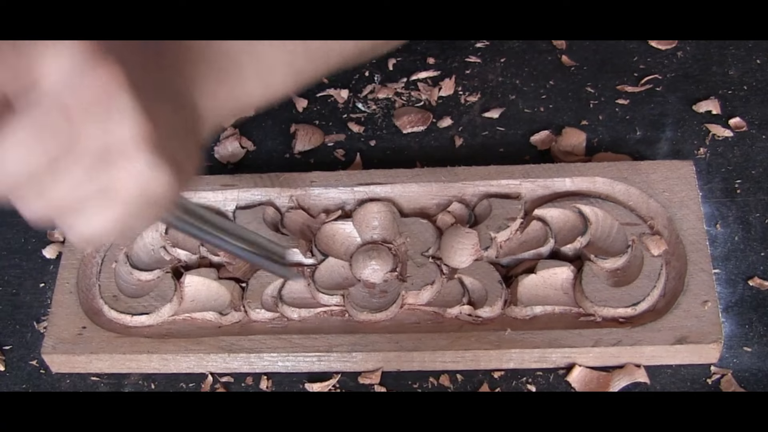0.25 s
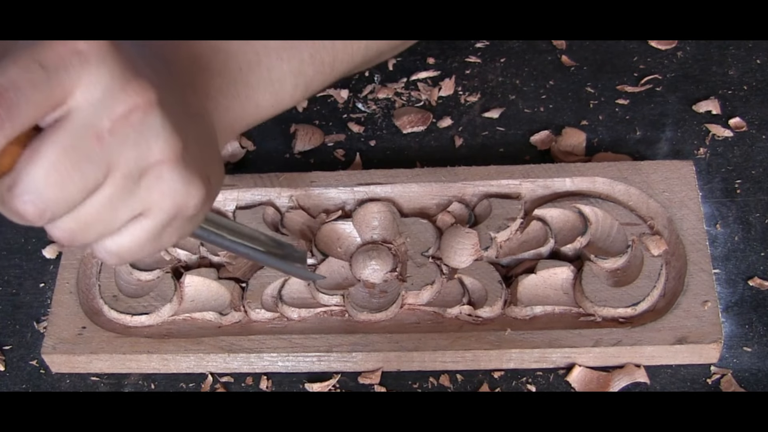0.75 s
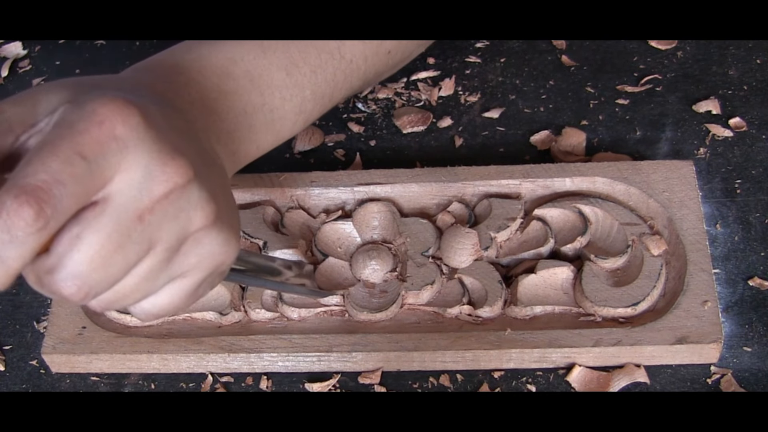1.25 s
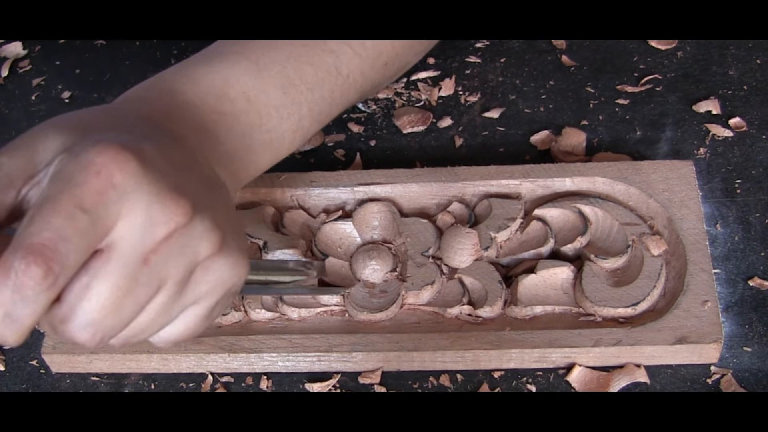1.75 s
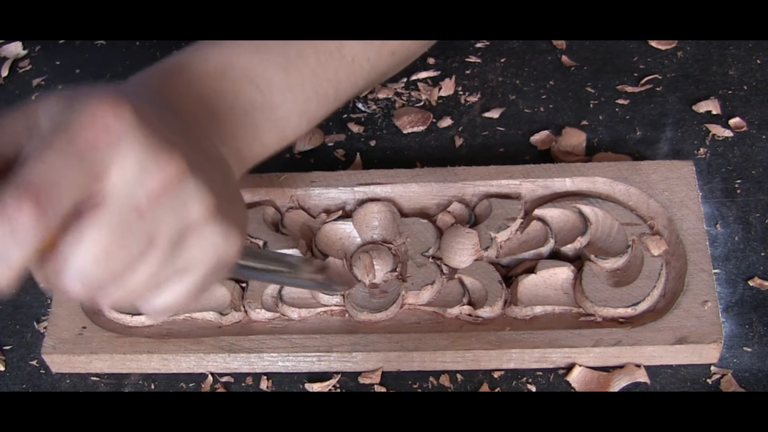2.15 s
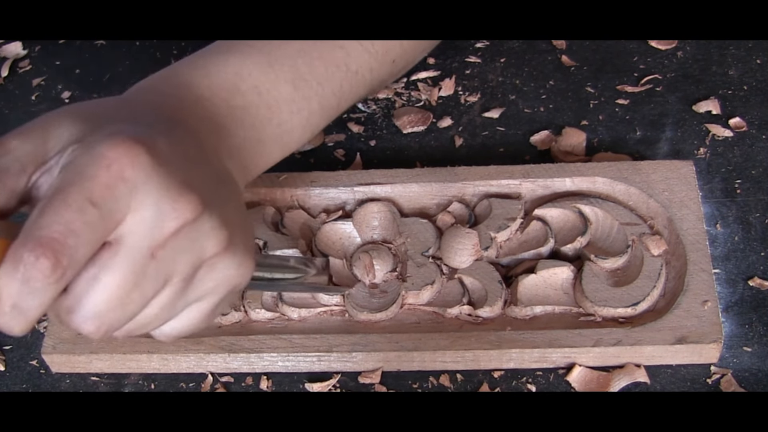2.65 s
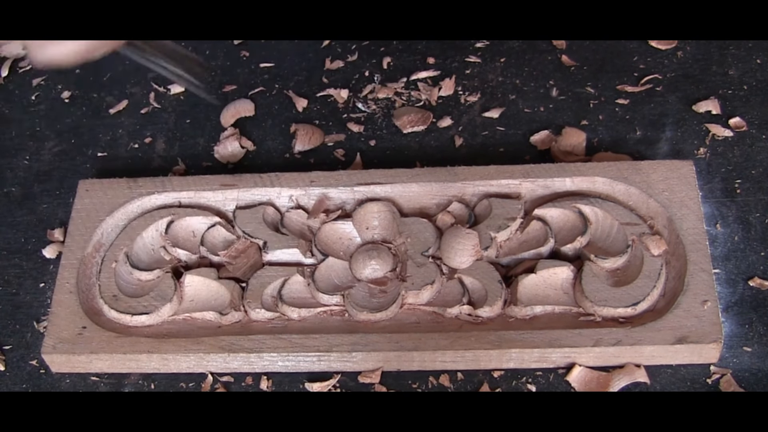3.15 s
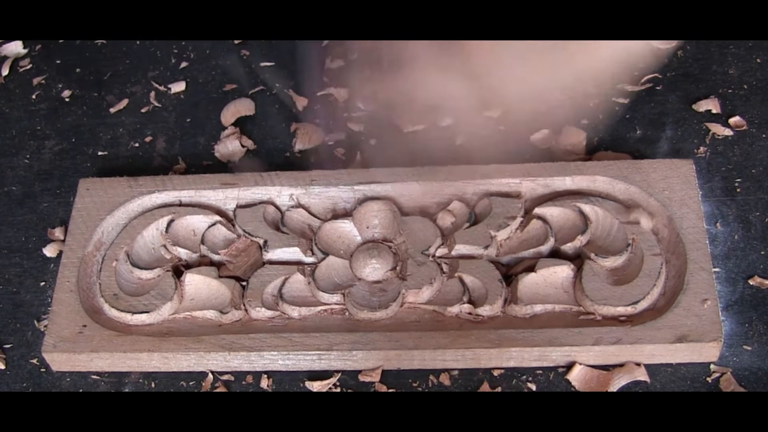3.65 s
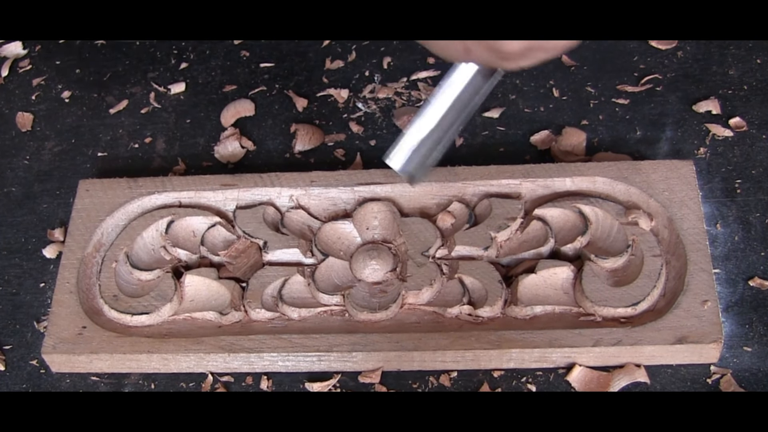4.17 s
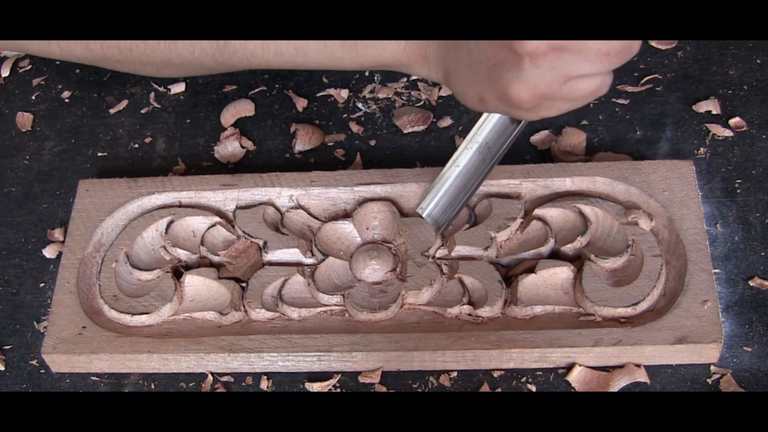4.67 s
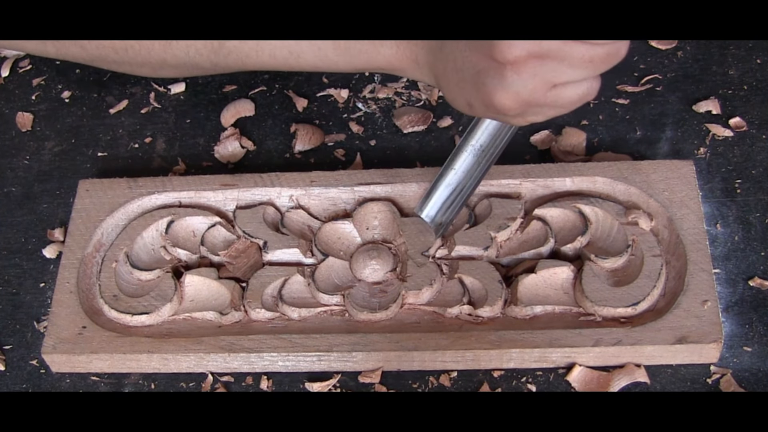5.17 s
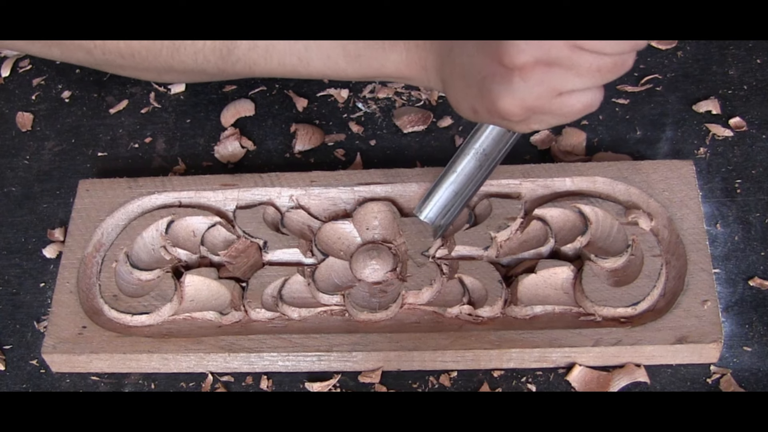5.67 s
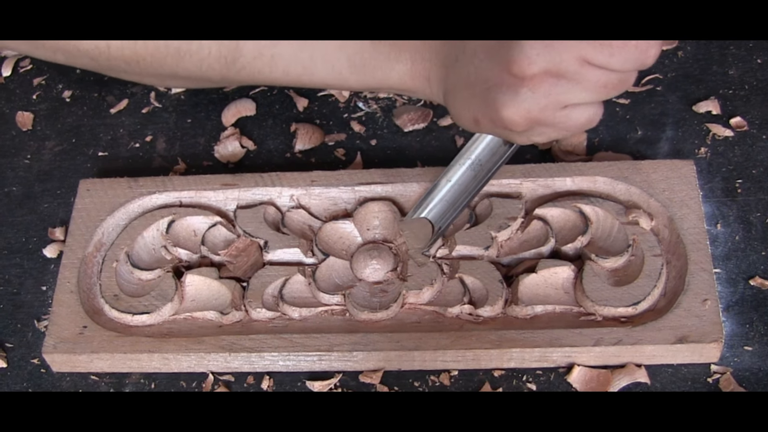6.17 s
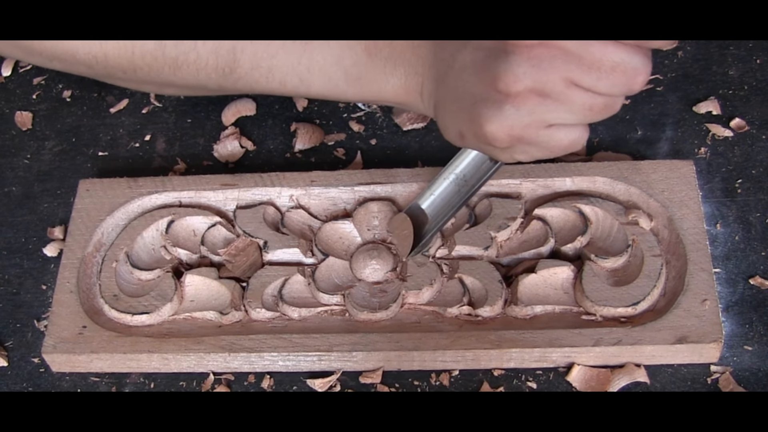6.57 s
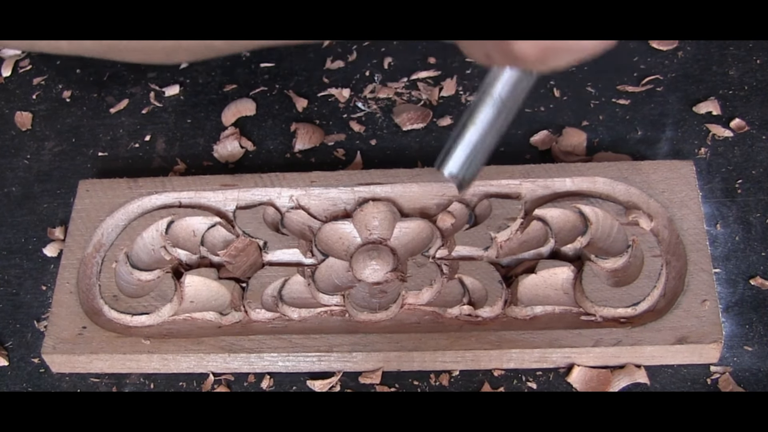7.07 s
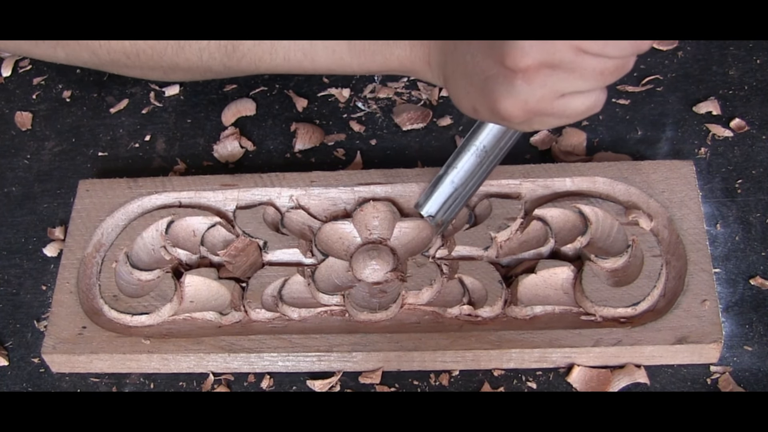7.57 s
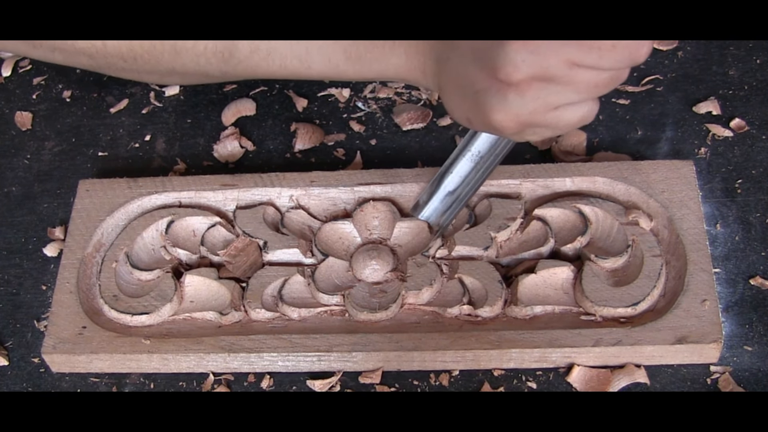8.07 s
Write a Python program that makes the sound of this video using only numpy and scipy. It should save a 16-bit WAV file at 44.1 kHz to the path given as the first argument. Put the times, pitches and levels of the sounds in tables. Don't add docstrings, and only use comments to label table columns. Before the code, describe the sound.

Close, dry wood carving in a quiet indoor workshop with a faint steady hum. Sharp, short woody knocks come in small groups with a narrow tool, with light clicks and rubs between. A hissing brush of the hand clears shavings, then quiet handling. A wider gouge brings fuller, louder knocks, a regular run of six swelling slightly, small ticks, a low skidding bump and a last blow.

```python
import sys
import numpy as np
from scipy import signal
from scipy.io import wavfile

SR = 44100
rng = np.random.default_rng(int(sys.argv[2]) if len(sys.argv) > 2 else 0)


def gain_from_db(level_db):
    decades = np.asarray(level_db, float) / 20
    return 10 ** decades


def unload_audio(sound):
    columns = np.transpose(np.atleast_2d(sound))
    steps = np.round(np.clip(columns, -1, 1) * 32767)
    wavfile.write(sys.argv[1], SR, steps.astype(np.int16))


N = 366912
T = np.arange(N) / SR
BAND_EDGES_HZ = 30 * 2 ** (np.arange(29) / 3)

# start in seconds, peak in dB, thud in dB, brightness in dB.
NARROW_BLOWS = [
    (0.023, -5, 3.5, 10.5),
    (1.421, -5, 5.5, -2),
    (1.661, -5.5, 1.5, 3),
    (1.882, -3, 2.5, 4),
    (2.562, -3.5, 2, -2.5),
    (2.754, -5, 4, 2.8),
    (2.956, -5, 11.5, -5.5),
]
# start in seconds, peak in dB, brightness in dB, rumble in dB,
# rumble length in seconds.
WIDE_BLOWS = [
    (5.544, -1, -5.5, -25.5, 0.061),
    (5.83, 0, -2.5, -24.5, 0.097),
    (6.09, 0.9, 0, -24, 0.1),
    (6.317, 1.63, -0.2, -25.5, 0.11),
    (6.546, 2, -0.5, -28, 0.1),
    (6.767, 1.7, -2.5, -26, 0.086),
    (8.253, 0.7, -2.5, -26.5, 0.078),
]
# frequency in Hz, level in dB, T60 in seconds.
NARROW_MODES = [(184, -21, 0.047), (280, -16, 0.14), (437, -6.5, 0.021), (523, -6, 0.025), (740, -6, 0.013),
                (1012, 0.9, 0.06), (1160, 7, 0.054), (1380, 2.5, 0.033), (1569.7, -14, 0.013),
                (1960, 2.5, .03), (2150, -1.5, 0.01), (3210, -13.5, 0.0098), (4040, -16, 0.015),
                (5100, -23.5, 0.0069)]
# frequency in Hz, level in dB, T60 in seconds.
WIDE_MODES = [(137, -20.5, 0.081), (186, -20, 0.22), (278, -18.5, 0.13), (420, -8, .06), (555, -5, 0.057),
              (720, -4, .04), (926.7, 6.5, 0.025), (1100, 0.5, 0.052), (1360, -8, 0.03), (1690, -4, 0.03),
              (2010, 4, 0.016), (2303, 8, 0.017), (2620, -2, 0.026), (3860, -10.5, 0.012)]
# frequency in Hz, level in dB, T60 in seconds.
BLADE_MODES = [(4500, -3, .1)]
# frequency in Hz, level in dB, T60 in seconds, rise in seconds.
BENCH_MODE = (79, -32, 0.45, .012)
# frequency in Hz, density in dB per Hz.
NARROW_CRACK = [(59, -50), (100, -22.5), (1260, -9.5), (2750, -12), (3390, -19.5), (6950, -36), (7730, -33),
                (12000, -39.5), (15500, -54)]
# frequency in Hz, density in dB per Hz.
WIDE_CRACK = [(59, -17), (100, -31.5), (898, -8.5), (2370, -1), (3320, -5.5), (3930, -6), (4660, -26),
              (9340, -25.5), (15500, -44.5)]
# frequency in Hz, density in dB per Hz.
NARROW_RUMBLE = [(24, -39), (40, -47.5), (162, -11.5), (309, -7), (472, -3), (838, 1.5), (1250, 4),
                 (3650, -17.5), (5170, -32), (10700, -37), (15500, -64)]
# frequency in Hz, density in dB per Hz.
WIDE_RUMBLE = [(24, -65), (40, -20.5), (183, -7), (333, -14.5), (417, -5), (670, -6.5), (1190, -0.5),
               (2160, -9), (2510, -7.5), (6640, -40), (15500, -60.5)]
# frequency in Hz, share of the rumble length as a ratio.
RUMBLE_SHARE = [(60, 0.73), (200, 1.7), (1000, 1.067), (4000, 1), (12000, 0.5)]
# start in seconds, peak in dB, body resonance in Hz,
# T60 in seconds, hiss in dB.
TICKS = [(0.142, -35.5, 420, 0.12, 6.5), (0.271, -49, 2750, 0.043, 3), (0.527, -26, 2885, 0.13, -30),
         (0.528, -23, 1606, 0.1, -45), (0.674, -40.5, 323, 0.051, -10), (0.676, -50, 3500, 0.12, -10),
         (0.977, -28, 252, 0.084, -25), (0.977, -41, 1500, 0.029, -8), (3.055, -22.5, 1960, 0.044, -5),
         (3.053, -25.5, 408, 0.089, -20.5), (3.174, -45, 3500, 0.046, -8), (3.188, -49.5, 2200, 0.093, 6),
         (3.447, -37, 740, 0.26, -3.5), (3.511, -28, 2400, 0.11, -10.5), (3.909, -49.5, 1800, 0.11, 4.5),
         (4.338, -42, 1380, 0.086, -0.5), (6.937, -29.5, 3880, 0.076, 7), (6.934, -32.5, 450, 0.11, -21),
         (7.238, -33.5, 2970, 0.094, -1.5), (7.553, -42.5, 247, 0.097, -17),
         (7.733, -45.5, 250, 0.067, -10)]
# start in seconds, level in dB, body resonance in Hz,
# T60 in seconds, hiss in dB.
SCUFFS = [(.165, -42, 1330, 0.11, -7), (.563, -56, 7000, 0.06, -12), (.697, -53, 890, 0.16, -12),
          (2.233, -51.5, 1580, 0.12, 9.5), (2.431, -63.5, 887, 0.079, 7), (3.032, -44, 1900, 0.12, 6.5),
          (3.313, -56, 1520, 0.34, 5), (3.446, -45, 918, 0.52, -10.5), (3.467, -47, 1900, 0.09, -20),
          (3.526, -41, 1100, 0.035, -12), (4.273, -61.5, 2500, 0.11, 0), (4.347, -57, 648, 0.27, -6),
          (4.566, -57.5, 1390, .08, -5), (4.782, -52, 255, .08, -17), (5.395, -56, 477, 0.19, -3),
          (7.222, -52, 5500, .08, -6)]
# start in seconds, level in dB, body resonance in Hz,
# T60 in seconds, hiss in dB.
HAND_SWEEP = [
    (3.612, -36, 700, 0.12, -6.5),
    (3.632, -33, 3200, 0.15, 8),
    (3.625, -52, 136, 0.071, -20.1),
]
# start in seconds, level in dB, body resonance in Hz, # T60 in
# seconds, hiss in dB.
SOFT_BLOW = [
    (7.975, -17.5, 700, .13, -20),
    (7.976, -27, 2050, 0.11, -28),
    (7.982, -37.5, 81, 0.201, -36),
    (7.98, -34, 220, .2, -35),
]
# frequency in Hz, density in dB per Hz.
HUM = [(25, -15.5), (62, -5.5), (105, -13), (145, -2), (200, 2.5), (250, -6), (330, -9), (570, -8),
       (1200, -14), (2400, -17.5), (5000, -24.5), (9000, -32), (13000, -34), (15800, -41.5)]
# frequency in Hz, likeness from 0 to 1.
LIKENESS = [(50, 0.82), (150, 1), (300, 0.68), (1500, 0.3), (6000, 0.45), (14000, .78)]
# start in seconds, peak in dB.
EARLIER_BLOW = (-.05, 5.5)
# start in seconds, end in seconds, level in dB.
HANDLING = (2.4, 3.7, -61.5)
# centre in seconds, half width in seconds, depth in dB.
GAP = (3.735, .011, -17)

TOOL_CHANGE_S = 4.5
NARROW_RUMBLE_DB, RUMBLE_PER_BRIGHT_DB, NARROW_RUMBLE_S = -26.5, 0.56, 0.06
WIDE_THUD_DB = -1
HUM_DB = -61
LINGER_DB, LINGER_T60_S = -54, 0.73
TICK_RISE_S, SCUFF_RISE_S, SWEEP_RISE_S, SOFT_BLOW_RISE_S = 0.00274, 0.021, 0.039, 0.029
SNAP_DB, SNAP_T60_S = 4.5, 0.0086


def at_hz(points, hz):
    points = np.array(points)
    return np.interp(np.log(hz), np.log(points[:, 0]), points[:, 1])


def add(out, s, x):
    i = round(s * SR)
    x = x[..., max(-i, 0):N - i]
    first = max(i, 0)
    out[..., first:first + x.shape[-1]] += x


def density(spectrum, hz):
    grid = np.arange(20, SR / 2, 20)
    rms = np.sqrt(np.mean(gain_from_db(at_hz(spectrum, grid)) ** 2))
    return gain_from_db(at_hz(spectrum, hz)) / rms


def banded_noise(envelope, width=1):
    out = 0
    white = rng.standard_normal((2, 2, N))
    for k, (low, high) in enumerate(zip(BAND_EDGES_HZ, BAND_EDGES_HZ[1:])):
        hz = np.sqrt(low * high)
        alike = np.clip(1 - width * (1 - at_hz(LIKENESS, hz)), 0, 1)
        band = signal.butter(2, [low, high], "band", fs=SR, output="sos")
        mid, side = signal.sosfilt(band, white[k % 2] * (envelope(hz) + 1e-12))
        out = out + np.sqrt((1 + alike) / 2) * mid + np.sqrt((1 - alike) / 2) * side * [[1], [-1]]
    return out


def drift(rate):
    slow = rng.standard_normal(int(N / SR * 60) + 2)
    return np.interp(T, np.arange(len(slow)) / rate, slow)


def workshop():
    start, end, hand_db = HANDLING
    moving = np.clip(np.minimum(T - start, end - T) / 0.1, 0, 1)
    power = gain_from_db(2 * HUM_DB) + gain_from_db(2 * hand_db) * moving
    for s, db, *_ in [EARLIER_BLOW, *NARROW_BLOWS, *WIDE_BLOWS]:
        linger_db = db + LINGER_DB - 60 * np.abs(T - s) / LINGER_T60_S
        power += (T > s) * gain_from_db(2 * linger_db)
    level = np.sqrt(power)
    together_db = 0.7 * drift(9)
    return banded_noise(lambda hz: density(HUM, hz) * level * gain_from_db(together_db + 1.2 * drift(12)))


def blows():
    narrow = []
    for row in NARROW_BLOWS:
        narrow.append((*row, NARROW_RUMBLE_DB + RUMBLE_PER_BRIGHT_DB * row[-1], NARROW_RUMBLE_S))
    wide = [(s, db, WIDE_THUD_DB, *rest) for s, db, *rest in WIDE_BLOWS]
    return narrow, wide


def ringing(modes, thud_db, bright_db, bench_db):
    t = T[:SR // 2]
    hz, db, t60, rise = BENCH_MODE
    bench = gain_from_db(db + bench_db - 60 * t / t60) * (1 - np.exp(-t / rise)) * np.sin(2 * np.pi * hz * t)
    out = np.zeros((2, len(t)))
    for (hz, db, t60), (a, b, c) in zip(modes, rng.standard_normal((len(modes), 3))):
        tilt_db = at_hz([(500, thud_db), (1200, 0), (2500, bright_db)], hz)
        place = 1 + 0.078 * b * np.array([[1], [-1]])
        wave = np.sin(2 * np.pi * hz * (1 + 0.0052 * c) * t) * place
        out += np.sign(c) * gain_from_db(db + tilt_db + 1.5 * a - 60 * t / (0.64 * t60)) * wave
    out = out * (1 - np.exp(-t / 0.000081))
    return bench + signal.sosfilt(signal.butter(4, 115, "high", fs=SR, output="sos"), out)


def knocks():
    out = np.zeros((2, N))
    for rows, modes, bench_db in zip(blows(), (NARROW_MODES, WIDE_MODES), (-6, 1.5)):
        for s, db, thud_db, bright_db, *_ in rows:
            add(out, s + 0.0003, gain_from_db(db - 11) * ringing(modes, thud_db, bright_db, bench_db))
    return out


def blow_noise(hz):
    out, t = np.zeros(N), T[:SR // 2]
    setups = zip(blows(), (NARROW_CRACK, WIDE_CRACK), (NARROW_RUMBLE, WIDE_RUMBLE), (1.3, 1.6))
    for rows, crack, rumble, bend in setups:
        for s, db, thud_db, bright_db, rumble_db, length in rows:
            tilt_db = at_hz([(500, thud_db), (1200, 0.015), (2500, bright_db)], hz)
            sharp = gain_from_db(db + tilt_db) * density(crack, hz)
            decay = gain_from_db(-7 - 60 * t / 0.022 * (hz / 2000) ** 0.25)
            add(out, s + 0.0004, sharp * decay * min(hz / 200, 1) ** 2)
            sink = gain_from_db(-20 * (t / (length * at_hz(RUMBLE_SHARE, hz))) ** bend) * np.minimum(t / 0.005, 1)
            add(out, s + 0.0013, gain_from_db(rumble_db) * density(rumble, hz) * sink)
    return out


def through_modes(x, modes, plain=0.77, sharpness=20):
    out = plain * x
    for hz, _, _ in modes:
        r = np.exp(-np.pi * (25 + hz / sharpness) / SR)
        gain = 0.53 * (1 - r * r) / 2
        poles = [1, -2 * r * np.cos(2 * np.pi * hz / SR), r * r]
        out = out + signal.lfilter([gain, 0, -gain], poles, x)
    return out


def cracks_and_rumbles():
    noise, change = banded_noise(blow_noise, width=0.61), round(TOOL_CHANGE_S * SR)
    narrow = through_modes(noise[:, :change], NARROW_MODES)
    wide = through_modes(noise[:, change:], WIDE_MODES)
    wide += through_modes(wide, BLADE_MODES, plain=0, sharpness=150) * gain_from_db(14)
    return np.hstack([narrow, wide])


def touch_noise(hz):
    out, t = np.zeros(N), T[:SR // 2]
    groups = ((TICKS, -9, TICK_RISE_S), (SCUFFS, 0, SCUFF_RISE_S),
              (HAND_SWEEP, 0, SWEEP_RISE_S), (SOFT_BLOW, 0, SOFT_BLOW_RISE_S))
    for rows, gain_db, rise in groups:
        for s, db, body_hz, t60, hiss_db in rows:
            body = 2.12 * np.sqrt(1000 / body_hz) / (1 + (1.082 * np.log2(hz / body_hz)) ** 6)
            hiss = gain_from_db(hiss_db - 3 * np.log2(max(hz, 1000) / 1000)) * min(hz / 300, 1)
            swell = np.sin(np.pi / 2 * np.minimum(t / rise, 1)) ** 2
            fade = gain_from_db(-60 * np.maximum(t - rise, 0) / t60 * (hz / 1500) ** 0.18)
            if rows is TICKS:
                fade = fade + gain_from_db(SNAP_DB - 60 * np.abs(t - rise) / SNAP_T60_S)
            colour = body + hiss * np.minimum(fade, 1) ** 0.4
            add(out, s, gain_from_db(db + gain_db) * colour * swell * fade)
    return out


def touches():
    grain = gain_from_db(3.2 * np.interp(T, np.arange(N // 50) / 400, rng.standard_normal(N // 50)))
    rubbing = banded_noise(lambda hz: grain * touch_noise(hz))
    rubbing = through_modes(rubbing, NARROW_MODES, plain=0.86)
    return signal.sosfilt(signal.cheby2(8, 30, 14000, fs=SR, output="sos"), rubbing)


def tick_rings():
    out, t = np.zeros(N), T[:SR // 5]
    detunings = rng.uniform(0.11, 0.397, (len(TICKS), 2))
    for (s, db, body_hz, t60, _), (low, high) in zip(TICKS, detunings):
        phase = 2 * np.pi * body_hz * t
        neighbours = np.sin(phase * (1 - low)) - np.sin(phase * (1 + high))
        rings = np.sin(phase) + gain_from_db(-4 - 60 * t / t60) * neighbours
        add(out, s + TICK_RISE_S / 2, gain_from_db(db - 9 - 60 * t / (0.55 * t60)) * rings)
    return out


def scene():
    blow_sound = knocks() + cracks_and_rumbles()
    return (blow_sound + touches() + tick_rings() + workshop()) * gain_from_db(0) * np.array(CHANNEL_GAIN())


def CHANNEL_GAIN():
    return gain_from_db([[-0.25], [0.25]])


def pre_echo(x):
    count = SR // 42
    noise = rng.standard_normal((2, count))
    band = signal.butter(1, [1200, 6000], "band", fs=SR, output="sos")
    rise = np.sin(np.pi / 2 * np.arange(count) / count) ** 1.5
    spread = signal.sosfilt(band, noise + 0.5 * noise[::-1]) * rise
    spread = gain_from_db(-17) * spread / np.sqrt(np.sum(spread ** 2) / 2)
    return x + signal.fftconvolve(x, spread, axes=1)[:, count - 1:count - 1 + N]


def low_pass(x):
    return signal.sosfilt(signal.butter(12, 16470, fs=SR, output="sos"), x)


def record(dry):
    s, half_width, db = GAP
    faded = dry * gain_from_db(db * np.maximum(1 - np.abs(T - s) / half_width, 0))
    thin = signal.sosfilt(signal.butter(2, 40, "high", fs=SR, output="sos"), faded)
    thin = signal.sosfilt(signal.cheby2(10, 50, 16200, fs=SR, output="sos"), thin)
    rounded = 1.054 * np.tanh(thin / 1.017)
    return low_pass(pre_echo(rounded))


dry = scene()
out = record(dry)
unload_audio(out)
```